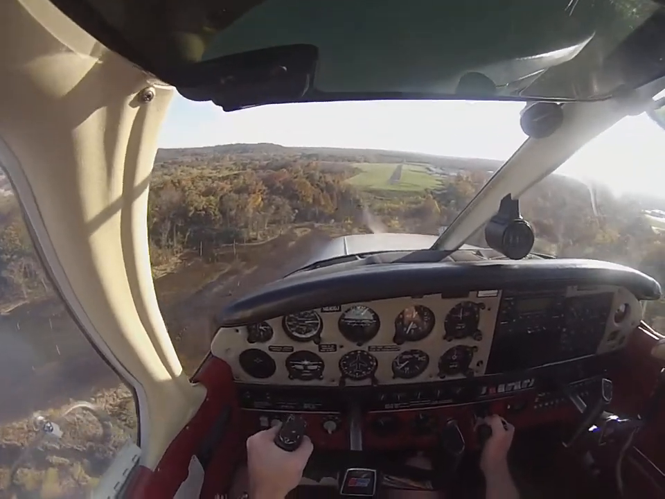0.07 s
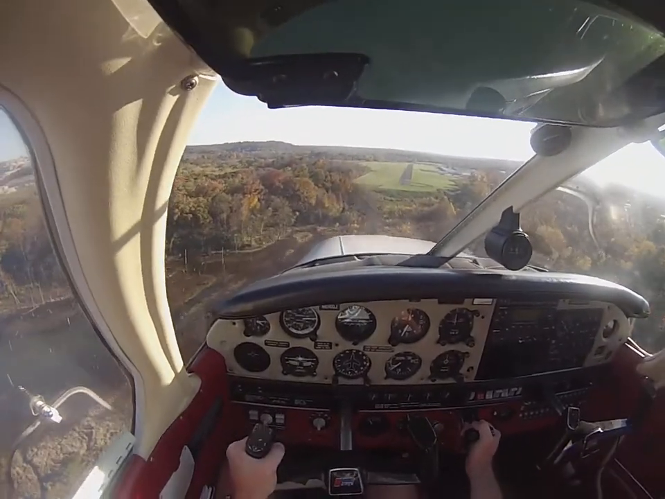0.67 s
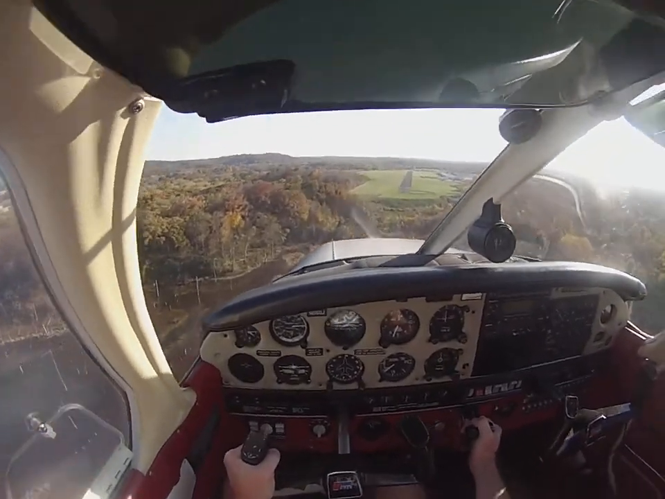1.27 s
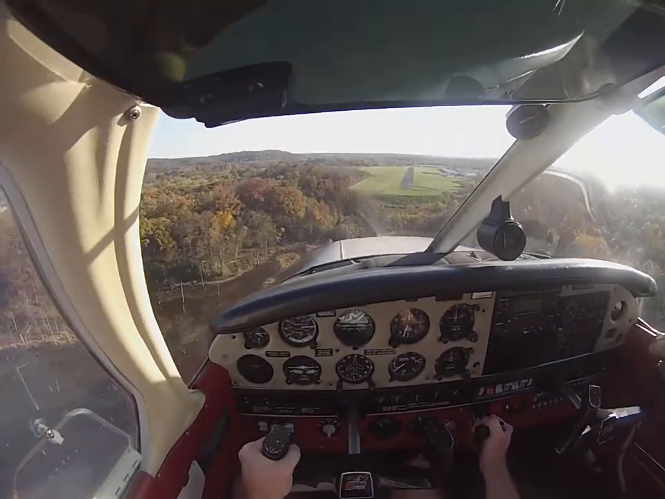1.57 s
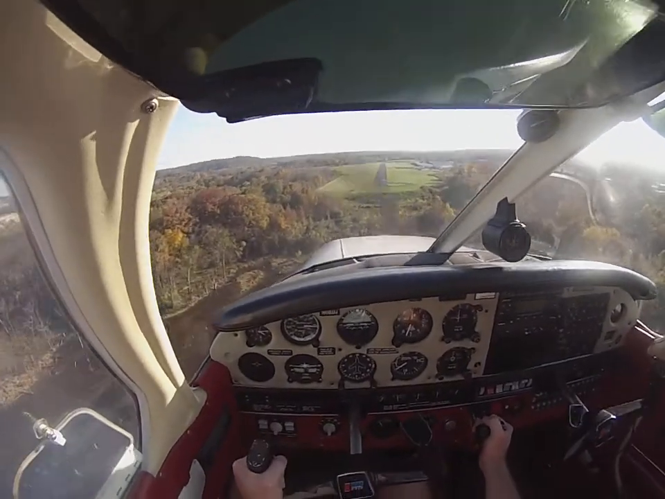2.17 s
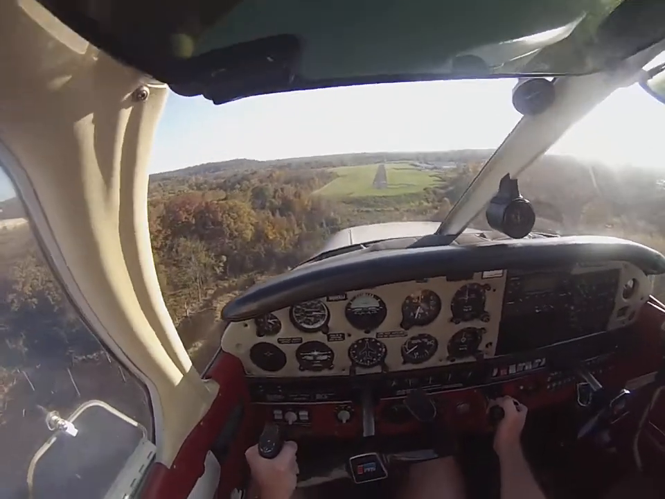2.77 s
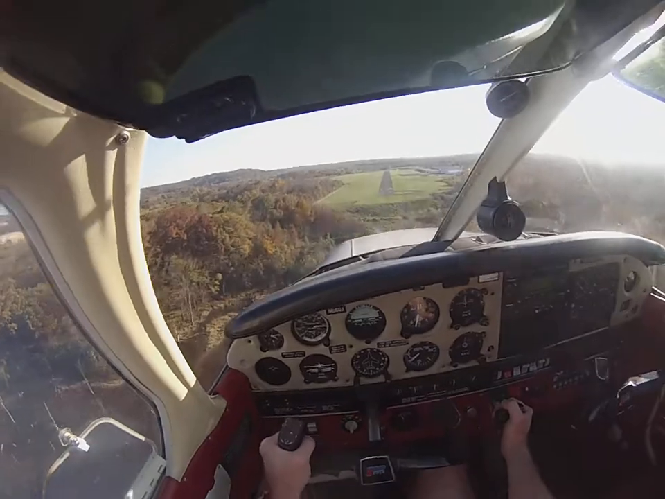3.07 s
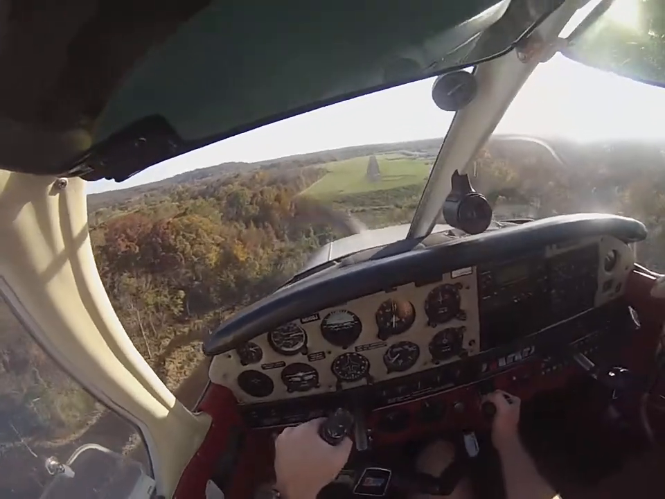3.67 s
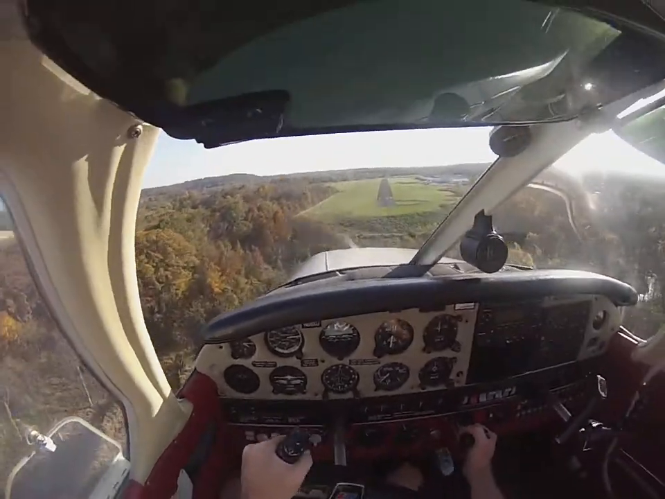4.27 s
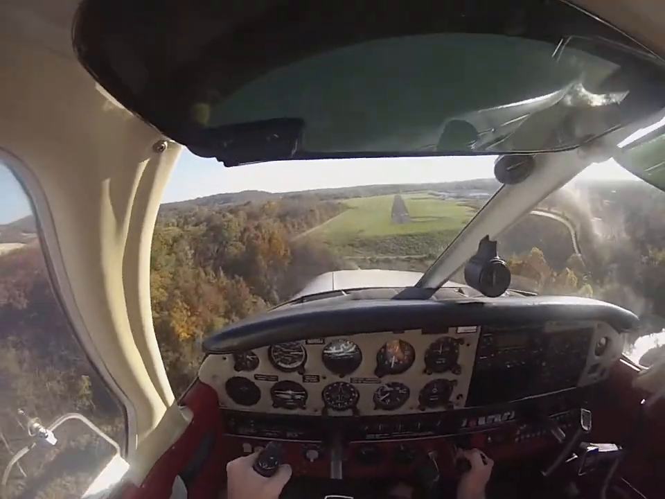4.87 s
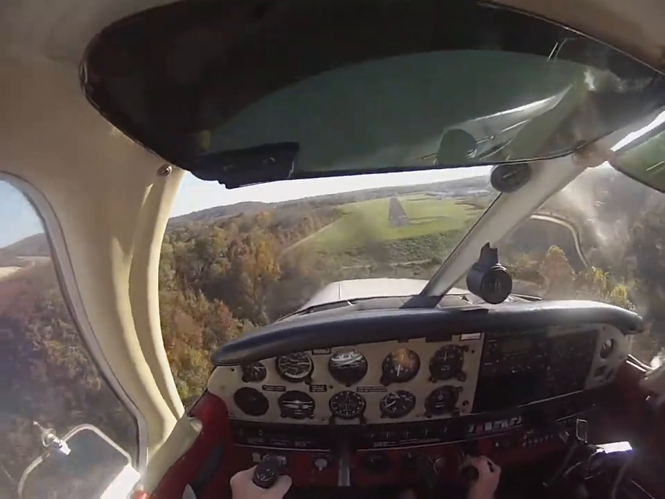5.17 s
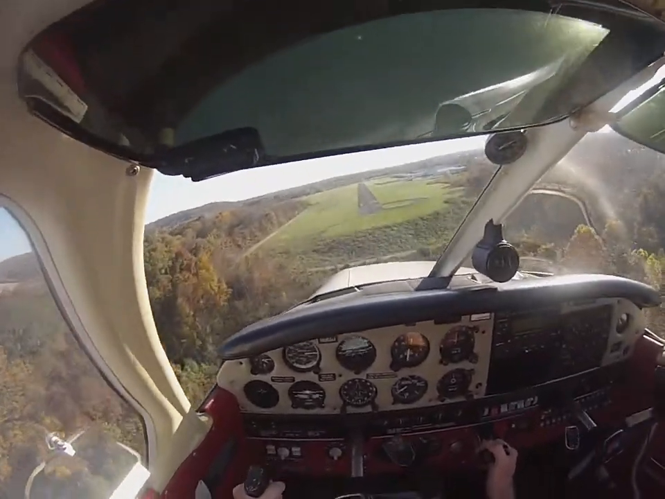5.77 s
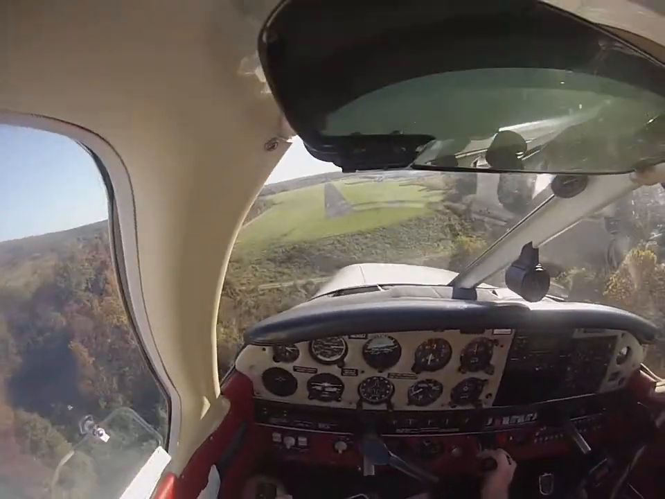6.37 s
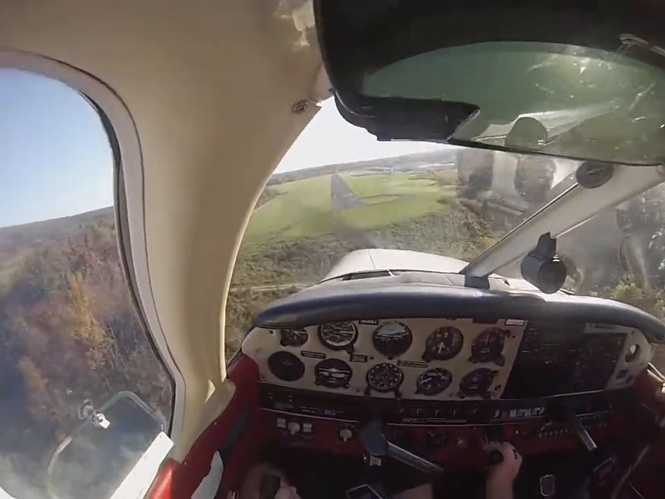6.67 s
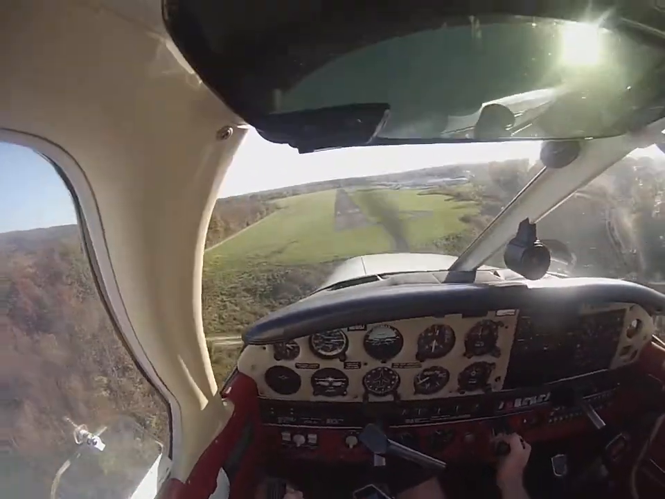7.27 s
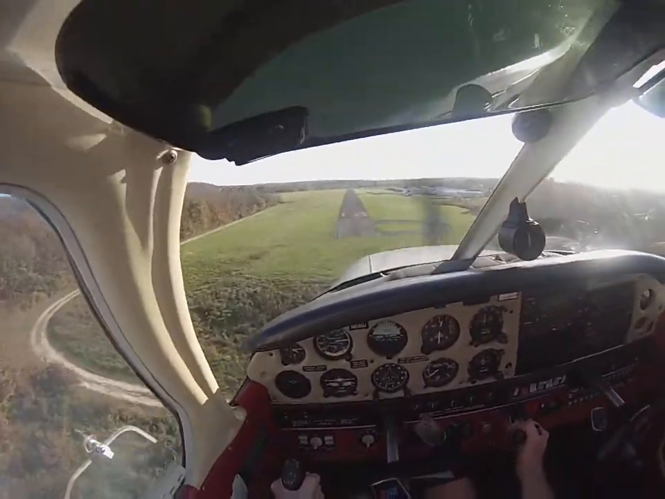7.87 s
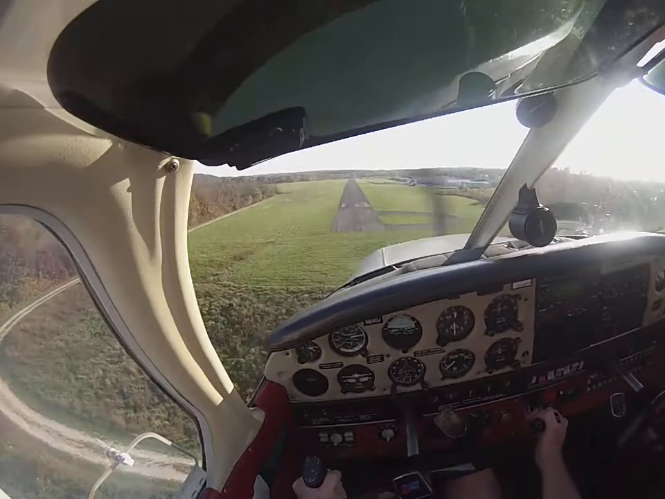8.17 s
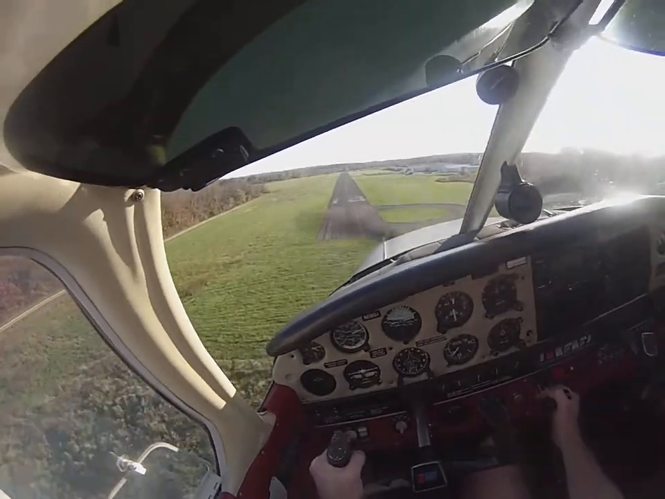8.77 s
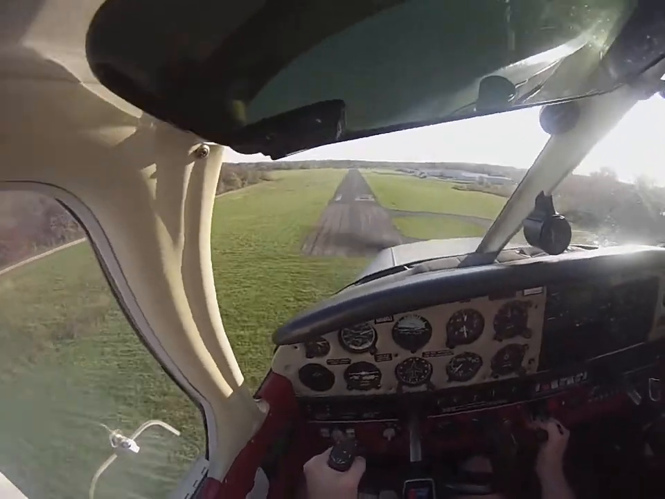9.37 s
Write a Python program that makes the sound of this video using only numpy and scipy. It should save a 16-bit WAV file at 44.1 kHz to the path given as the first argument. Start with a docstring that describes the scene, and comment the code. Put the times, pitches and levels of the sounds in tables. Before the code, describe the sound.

A low piston-engine drone fills the cabin of a light aircraft, heard from inside the cockpit. For the first five seconds it holds a nearly steady pitch with a raspy edge, over a dark roar of airflow and a faint breathy vent whistle. A door seal hisses softly, swelling and fading, and ticks once near 2.8 seconds. A loose fitting rattles briefly at about 2.6, 4 and 4.8 seconds. From 5 to 6.5 seconds the throttle comes back: the drone slides down in pitch, and the rasp and whistle fade. Gusts buffet the airframe with a deep rumble, strongest near 7 seconds, while air keeps rushing over the windscreen. The seal hiss dips around 6 seconds and returns near 8. A few more light rattles come just after 9 seconds, as the engine sinks a little further.

```python
"""A low piston-engine drone fills the cabin of a light aircraft on final approach, then sinks in pitch
as the throttle comes back after five seconds. Shaft speed sets the pitch and balance of the drone,
the rasp of the cowling and the strength of the air rushing over the cabin. A door seal hisses as its
gap works open and shut and ticks once, gusts buffet the airframe and a loose fitting rattles at times."""
import sys
import numpy as np
from scipy import signal
from scipy.fft import rfft, irfft, next_fast_len
from scipy.io import wavfile
from scipy.ndimage import uniform_filter1d

SR = 44100
rng = np.random.default_rng(int(sys.argv[2]) if len(sys.argv) > 2 else 0)


def output_pcm(signal):
    """Save a mono or channel-first signal as 16-bit PCM at the path in sys.argv[1].

    Samples are clipped to [-1, 1] before scaling.
    """
    pcm = np.clip(np.atleast_2d(signal).T, -1, 1) * 32767
    wavfile.write(sys.argv[1], SR, np.round(pcm).astype(np.int16))


N = 425118

# propeller shaft speed (time [s], speed [turns/s])
SHAFT_SPEED = [(0, 28.45), (.9, 28.2), (1.5, 28.25), (2.6, 28.7), (3.9, 28.18), (4.4, 28.25), (4.9, 28.45),
               (5.35, 25.5), (5.6, 24.2), (6.1, 22.65), (6.6, 21.9), (7.7, 21.9), (9.3, 20.8), (9.64, 19.1)]
APPROACH_HZ = 28.4  # shaft speed before the throttle comes back
# body of the drone: blade and firing harmonics
# (multiple of shaft speed, base level [dB], change with shaft speed [dB/octave])
DRONE_HARMONICS = [(2, -47, -18), (4, -40.5, 1), (6, -52, 3), (8, -54, 25)]
# swells and dips on those harmonics (time [s], gain [dB])
DRONE_SWELL = [(0, 1.5), (1.05, 2), (1.45, -2), (2.6, 0.5), (4.2, -1.5), (4.6, -4.5), (5.1, 1.5),
               (5.85, -1), (6.9, 3), (7.9, -3), (8.4, -3.5), (9.15, 3), (9.64, -1.5)]
# exhaust and propeller overtones (multiple of shaft speed, level at full power [dB])
OVERTONES = [(1, -52), (3, -55), (5, -55), (10, -70), (12, -58), (13, -71), (14, -67), (15, -64), (17, -59),
             (17.5, -63), (18, -67), (18.5, -67), (19, -65), (21, -64), (22, -64), (23, -63), (24, -66),
             (24.5, -66), (26.5, -70), (29, -71)]
# ring of the cowling panels (centre [Hz], width [Hz], relative level [dB])
COWLING_MODES = [(1556, 160, 1), (3140, 46, -4.5), (3780, 270, -11.5)]
# dark cabin roar (frequency [Hz], relative level [dB])
ROAR_SPECTRUM = [(20, -1), (45, 10), (75, 10.5), (135, 12.5), (190, 5.5), (270, -0.5), (380, -3.5),
                 (510, -0.5), (570, -4), (650, -0.5), (870, -9), (1050, -6.5), (1800, -16), (3000, -55)]
# midrange rush of the cabin panels (centre [Hz], width [Hz], relative level [dB])
CABIN_MODES = [(1186, 180, -15), (1335, 266, -2), (1463, 140, 1), (1590, 92, -2)]
# bright slipstream over the windscreen (frequency [Hz], relative level [dB])
SLIPSTREAM_SPECTRUM = [(800, -24.5), (1800, -11.5), (1980, -4.5), (2250, 1), (2420, -5), (2560, -11),
                       (2780, -14.5), (3400, -16), (3830, -13), (4200, -23.5), (5500, -21), (7200, -29),
                       (9500, -34.5), (15000, -44)]
# rise and fall of that slipstream (time [s], level [dB])
SLIPSTREAM_LEVEL = [(0, -49), (.7, -48), (1.4, -49.5), (2.3, -48.5), (3.7, -49.5), (4.1, -49), (4.5, -49.5),
                    (5.7, -49.5), (6.4, -52), (7.15, -48.8), (8.8, -52.5), (9.64, -50.5)]
# breathy vent whistle (centre [Hz], width [Hz], relative level [dB])
VENT_MODES = [(1154, 53, 0)]
# opening of the door seal (time [s], gap relative to its usual width [dB])
SEAL_GAP = [(0, -1), (1.1, -3), (2, 2.5), (2.6, -5), (2.9, 3.5), (4.05, 5), (4.65, -1.5), (5.25, 1),
            (5.5, 4.3), (5.92, 3), (6.25, -9), (7.5, -4), (7.85, 1), (9.1, 3), (9.64, -9)]
# colour of the seal's hiss (centre [Hz], width [Hz], relative level [dB])
SEAL_MODES = [(3840, 1000, -9.5), (4680, 890, -1), (5660, 560, -5.5), (6350, 410, 1), (6690, 430, 1.5),
              (7650, 550, -6.5), (8170, 380, -8), (8940, 440, -14), (10800, 1500, -20), (11500, 900, -21.5)]
# gusts on the airframe (time [s], level [dB])
GUSTS = [(0, -46), (.7, -48), (1.8, -42), (3.6, -43.5), (4.6, -40), (5.8, -42), (6.3, -37.5), (6.8, -34.5),
         (7.4, -42.5), (8.1, -42), (8.7, -46.5), (9.64, -45)]
# deep rumble of the buffet (frequency [Hz], relative level [dB])
BUFFET_SPECTRUM = [(3, -8), (10, -1), (20, -4.5), (30, -0.5), (40, -10), (55, -10), (90, -42), (200, -80)]
# rattles of a loose fitting (time [s], strength [dB], decay [s])
RATTLES = [(2.63, -39.5, 0.005), (2.65, -42.5, .007), (3.905, -43.5, 0.0046), (4.07, -39.5, 0.0066),
           (4.822, -42, .007), (9.022, -41, .005), (9.262, -43, .008), (9.287, -44, .006),
           (9.31, -46, .005)]
# ring of that fitting (centre [Hz], width [Hz], relative level [dB])
FITTING_MODES = [(2380, 550, 6), (2980, 840, -5.5), (3800, 550, -3), (5800, 2300, -14)]
# a small bright tick from the door seal (time [s], strength [dB], decay [s])
SEAL_TICKS = [(2.771, -51, .005)]
# colour of that tick (frequency [Hz], relative level [dB])
TICK_SPECTRUM = [(2000, -20), (5000, -4), (7800, 0), (9000, -13), (14000, -30)]


def engine(angle, shaft_hz, octaves, power_db, waver_db=1.45, flutter_db=1.5, jitter_rad=0.076):
    """Two blades and two firings pass per turn; uneven combustion makes the overtones flutter."""
    node_hz, node_width_hz, node_db, node_turn_rad = 100.6, 6.7, -9.5, 1.41
    swell_db, drone = curve(DRONE_SWELL), np.zeros(N)
    # as the engine slows, the lowest harmonic takes over and the next lines up with it
    for multiple, db, db_per_octave in DRONE_HARMONICS:
        # a standing-wave node in the cabin swallows a harmonic sliding through it and turns its phase
        from_node = (multiple * shaft_hz - node_hz) / node_width_hz
        dip_db = node_db * np.exp(-from_node ** 2)
        turn = node_turn_rad * (1 + np.tanh(from_node)) / 2
        level_db = db + swell_db + db_per_octave * octaves + dip_db + waver_db * wander(14)
        drone -= undb(level_db) * np.cos(multiple * angle + turn)
    for multiple, db in OVERTONES:
        phase = multiple * angle + rng.uniform(0, 2 * np.pi) + jitter_rad * wander(12)
        drone += undb(db + power_db + flutter_db * wander(9)) * np.sin(phase)
    return np.sqrt(2) * drone


def cowling(angle, power_db, full_power_db=-56, pulse_depth=0.26, waver_db=0.98):
    """Valve gear and exhaust rasp ring the panels in step with the firings, fading with the throttle."""
    rasp = noise(resonances(COWLING_MODES)) * (1 + pulse_depth * np.cos(2 * angle))
    return rasp * undb(full_power_db + power_db + waver_db * wander(7.7))


def airflow(angle, octaves, gap_db, roar_db=-42.5, rush_db=-48, whistle_db=-56.5, chop=0.05):
    """Air shakes the cabin panels, harder with a fast propeller and an open seal."""
    roar = noise(spectrum(ROAR_SPECTRUM)) * undb(roar_db + 6 * octaves)
    flow_db = 5 * octaves + 0.22 * gap_db
    rush = noise(resonances(CABIN_MODES)) * undb(rush_db + flow_db - 0.63 * wander(25))
    slipstream = noise(spectrum(SLIPSTREAM_SPECTRUM)) * undb(curve(SLIPSTREAM_LEVEL) + 0.5 * wander(30))
    # the vent whistle dies away as the propeller slows
    whistle = noise(resonances(VENT_MODES)) * undb(whistle_db + 20 * octaves + 0.5 * wander(5))
    propeller_wash = 1 + chop * np.sin(angle)  # a light pulse on each turn
    return roar + propeller_wash * (rush + slipstream + whistle)


def door_seal(gap_db, hiss_db=-64, flicker_db=0.5):
    """Air hisses through a narrow gap, more or less as the aircraft yaws."""
    return noise(resonances(SEAL_MODES)) * undb(hiss_db + gap_db + flicker_db * wander(14))


def buffet():
    """Gusts rock the whole airframe with a deep rumble."""
    return noise(spectrum(BUFFET_SPECTRUM)) * undb(curve(GUSTS))


def knocks(events, colour, attack_s=0.001):
    """Short chattering contacts: bursts of noise that start fast and die away."""
    envelope = np.zeros(N)
    for start_s, db, decay_s in events:
        age = np.clip(np.arange(N) / SR - start_s, 0, .5)
        envelope += undb(db) * (1 - np.exp(-age / attack_s)) * np.exp(-age / decay_s)
    return envelope * noise(colour)


def undb(db):
    """Decibels to gain."""
    return 10 ** (np.asarray(db) / 20)


def curve(table):
    """(time [s], value) points joined by straight lines."""
    return np.interp(np.arange(N) / SR, *np.transpose(table))


def wander(rate_hz):
    """Smooth random drift with a spread near 0.75."""
    hold = int(SR / rate_hz)
    steps = np.repeat(rng.standard_normal(N // hold + 1), hold)
    return 1.02 * uniform_filter1d(uniform_filter1d(steps, hold), hold)[:N]


def noise(colour):
    """Noise of unit level, coloured by a gain at each frequency."""
    size = next_fast_len(N, True)
    coloured = irfft(rfft(rng.standard_normal(N), size) * colour, size)[:N]
    return coloured / np.std(coloured)


def frequencies():
    """Frequency of each spectral line [Hz]."""
    return np.maximum(np.fft.rfftfreq(next_fast_len(N, True), 1 / SR), 1)


def spectrum(points):
    """Gain of an EQ curve through (frequency [Hz], level [dB]) points."""
    hz, db = np.transpose(points)
    return undb(np.interp(np.log(frequencies()), np.log(hz), db))


def resonances(modes):
    """Gain of steep-sided resonances that add in power."""
    f = frequencies()
    peaks = (undb(db) / (1 + ((f * f - hz * hz) / (f * width)) ** 2) for hz, width, db in modes)
    return np.sqrt(sum(peak ** 2 for peak in peaks))


def scene():
    """The shaft drives the drone, the rasp and the propeller wash; the seal gap lets in hiss and rush."""
    shaft_hz, gap_db = curve(SHAFT_SPEED), curve(SEAL_GAP)
    octaves = np.log2(shaft_hz / APPROACH_HZ)
    power_db = -2.5 + 23 * octaves  # relative to full power, falling as the shaft slows
    angle = 2 * np.pi * np.cumsum(shaft_hz) / SR
    motor = engine(angle, shaft_hz, octaves, power_db) + cowling(angle, power_db)
    air = airflow(angle, octaves, gap_db) + door_seal(gap_db) + buffet()
    rattles = knocks(RATTLES, resonances(FITTING_MODES))
    tick = knocks(SEAL_TICKS, spectrum(TICK_SPECTRUM))
    return (motor + air + rattles + tick)[None]


def record(dry):
    """Quick fades keep the ends free of clicks; a steep low-pass trims the highest treble."""
    fade_s, cutoff_hz = .004, 15200
    fades = curve([(0, 0), (fade_s, 1), (N / SR - fade_s, 1), (N / SR, 0)])
    lowpass = signal.ellip(10, .2, 70, cutoff_hz, fs=SR, output="sos")
    return signal.sosfilt(lowpass, dry * fades)


dry = scene()
out = record(dry)
output_pcm(out)
```